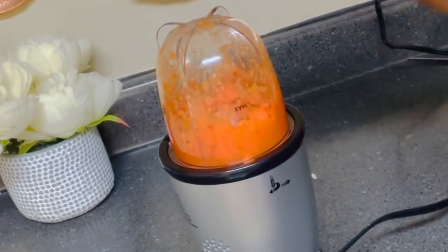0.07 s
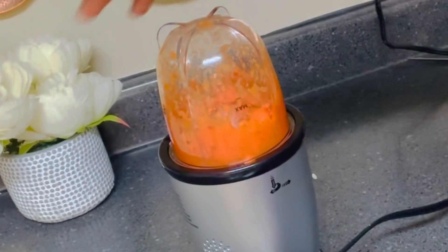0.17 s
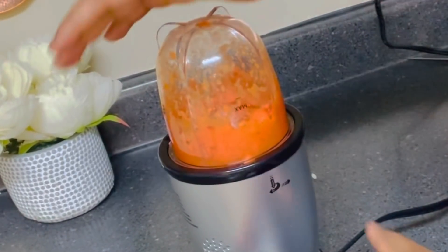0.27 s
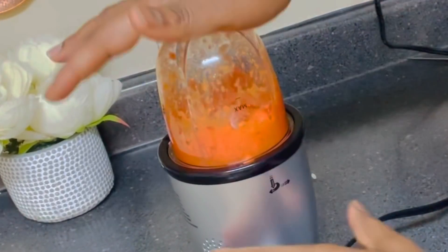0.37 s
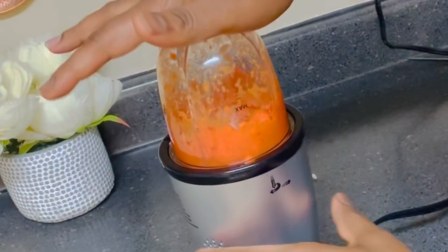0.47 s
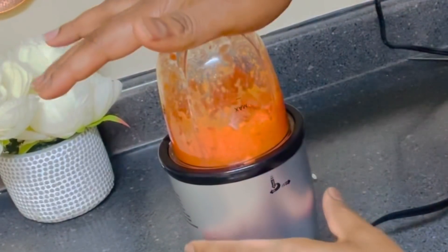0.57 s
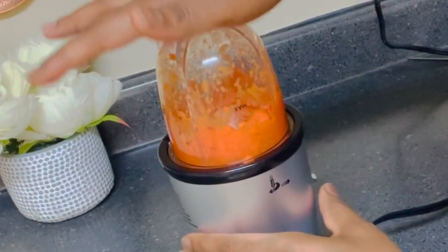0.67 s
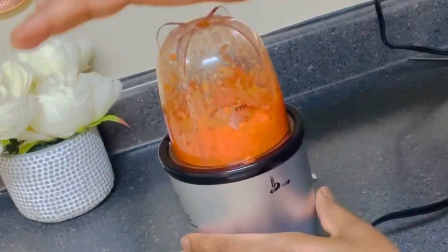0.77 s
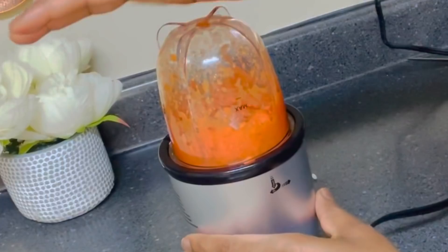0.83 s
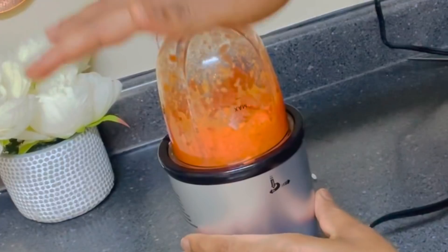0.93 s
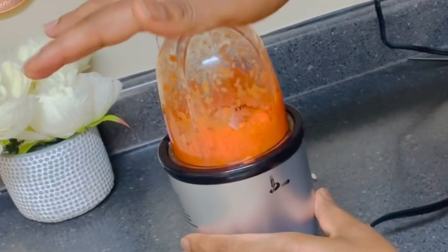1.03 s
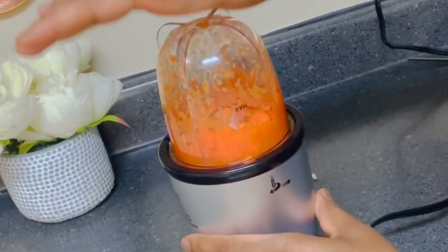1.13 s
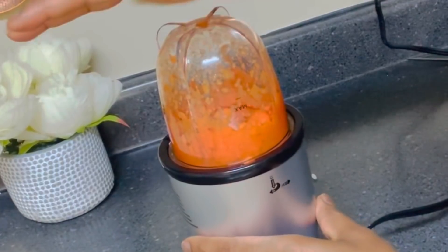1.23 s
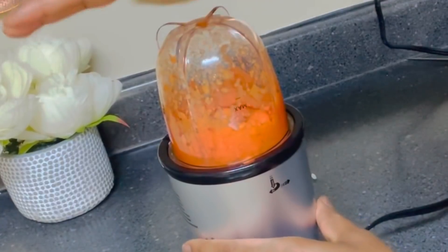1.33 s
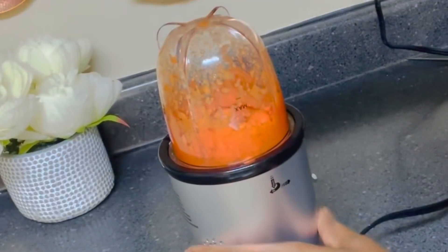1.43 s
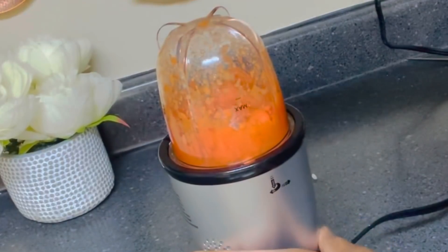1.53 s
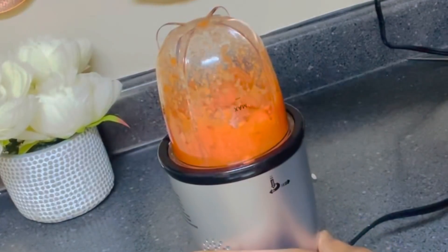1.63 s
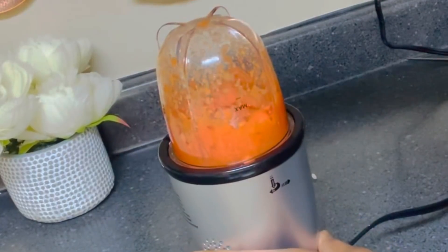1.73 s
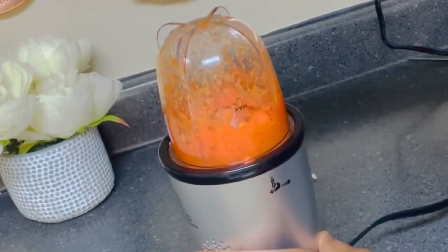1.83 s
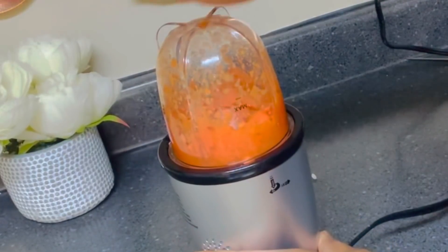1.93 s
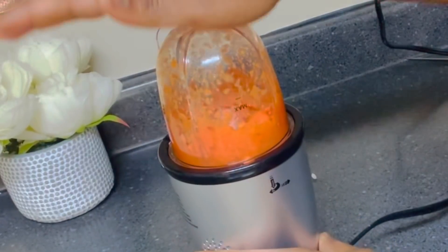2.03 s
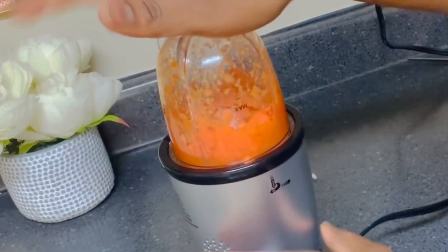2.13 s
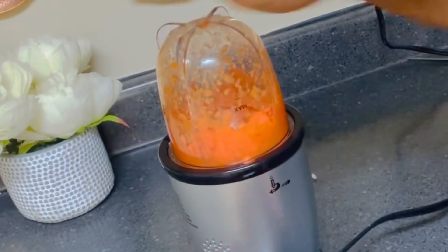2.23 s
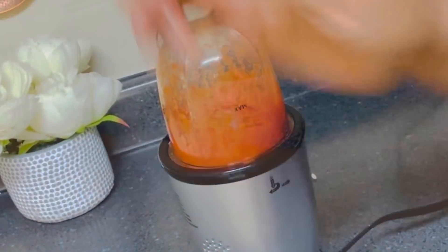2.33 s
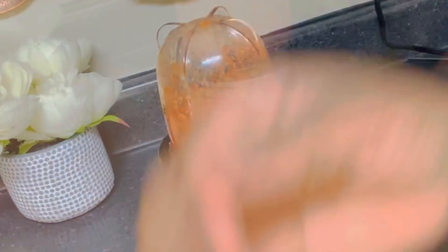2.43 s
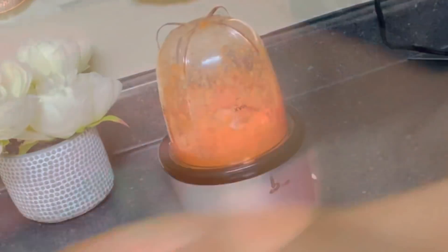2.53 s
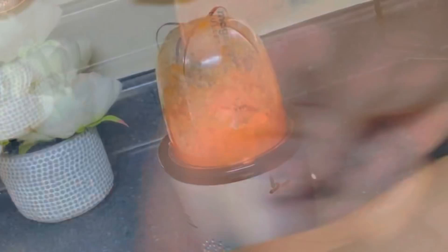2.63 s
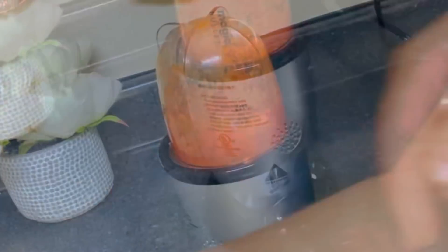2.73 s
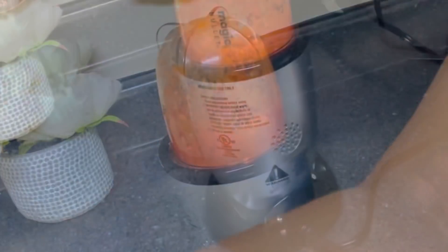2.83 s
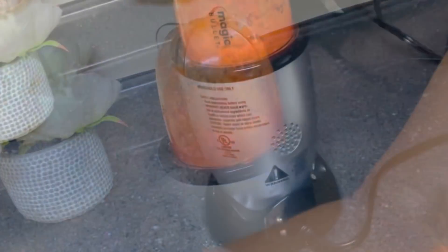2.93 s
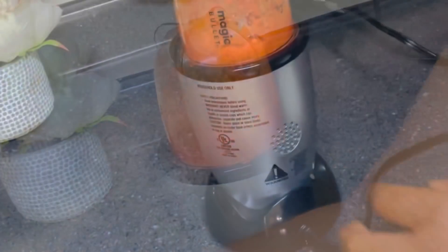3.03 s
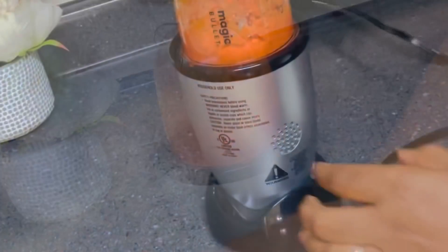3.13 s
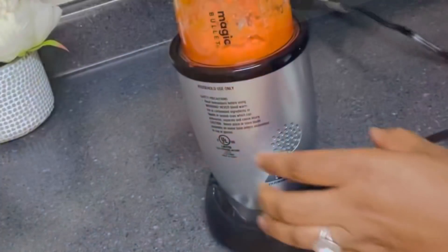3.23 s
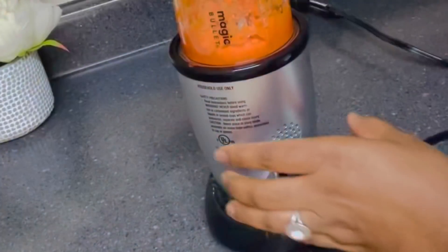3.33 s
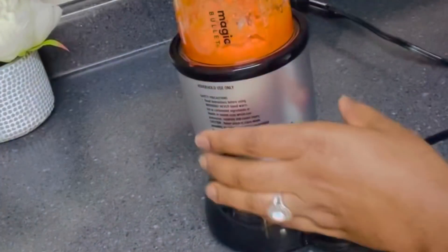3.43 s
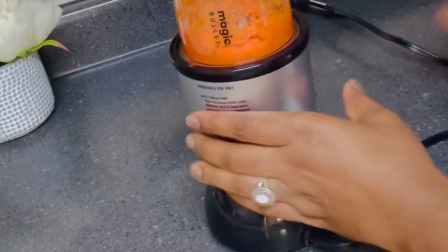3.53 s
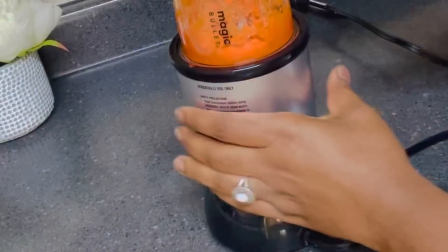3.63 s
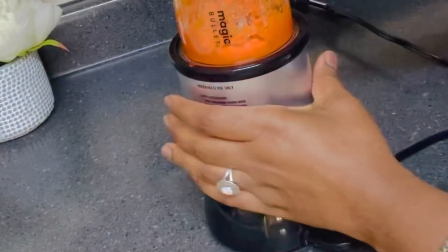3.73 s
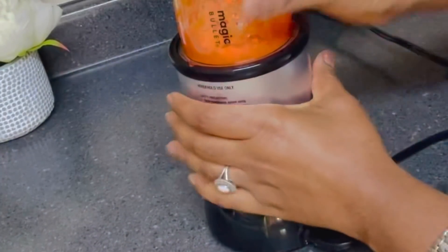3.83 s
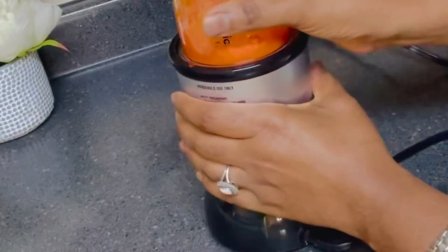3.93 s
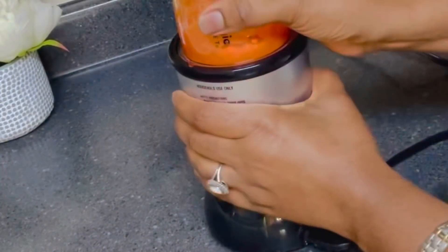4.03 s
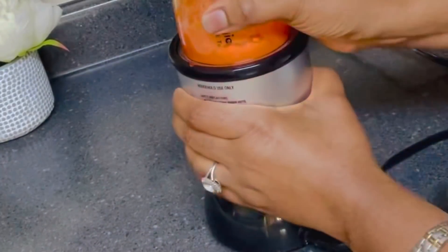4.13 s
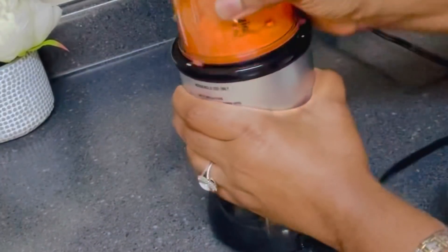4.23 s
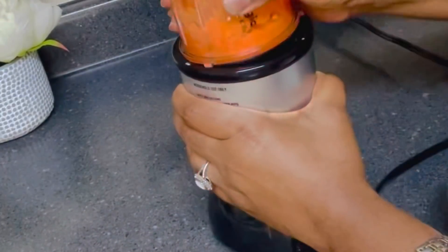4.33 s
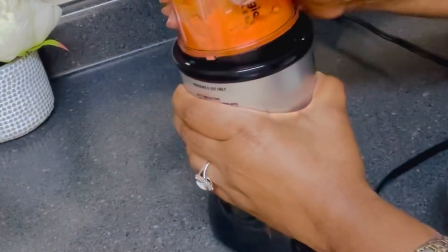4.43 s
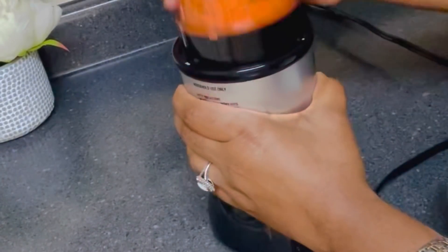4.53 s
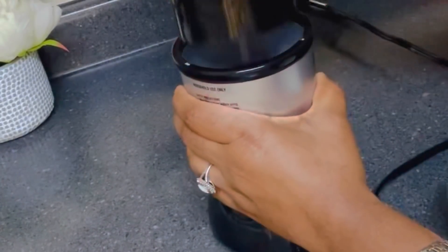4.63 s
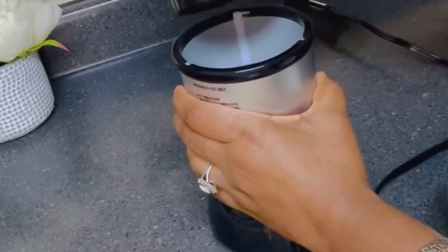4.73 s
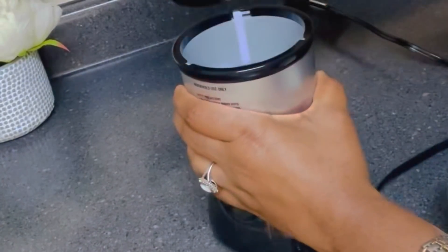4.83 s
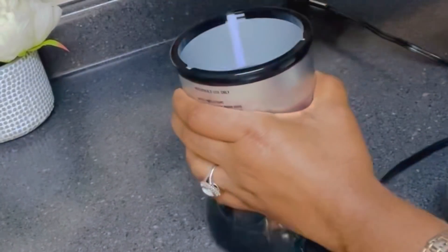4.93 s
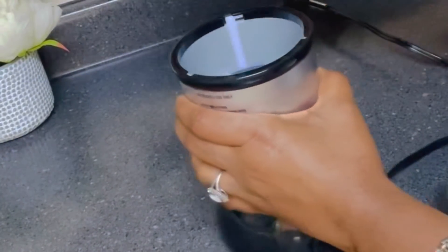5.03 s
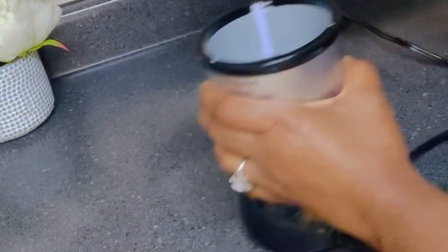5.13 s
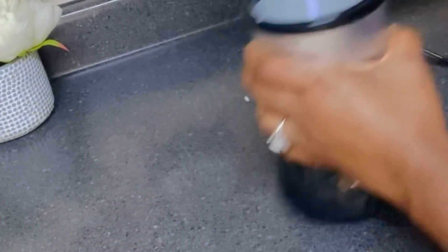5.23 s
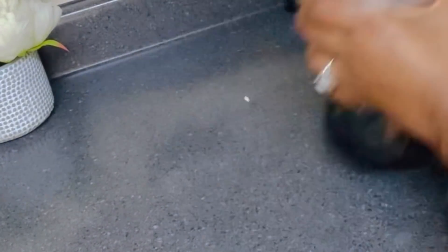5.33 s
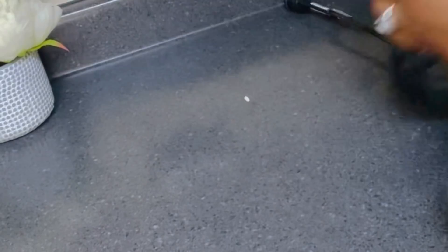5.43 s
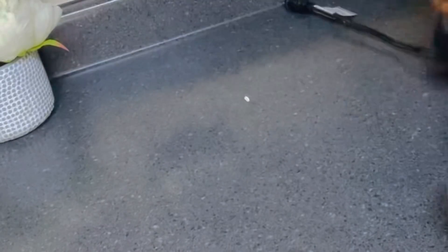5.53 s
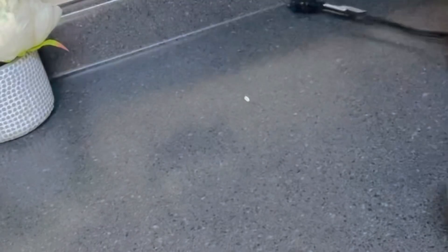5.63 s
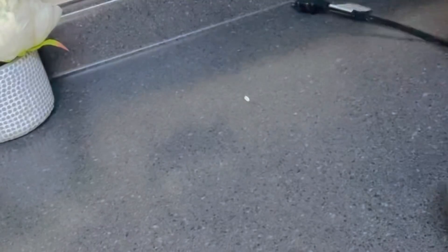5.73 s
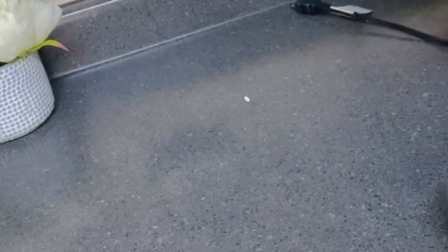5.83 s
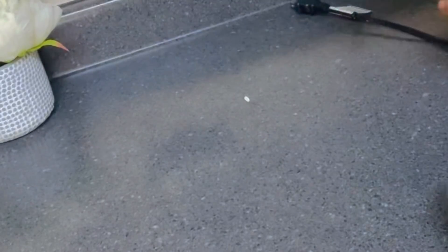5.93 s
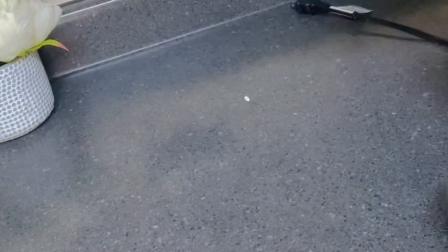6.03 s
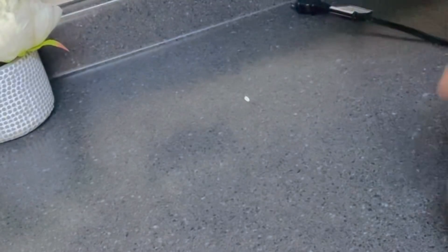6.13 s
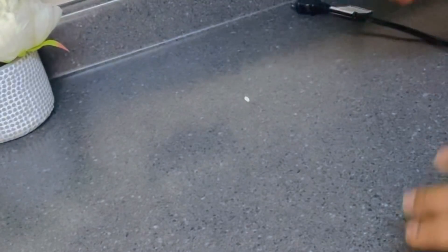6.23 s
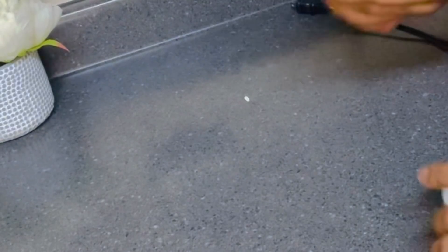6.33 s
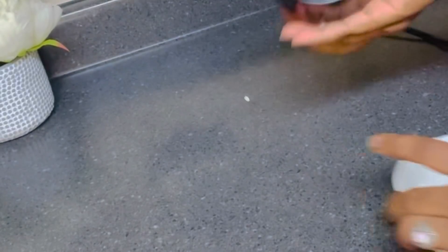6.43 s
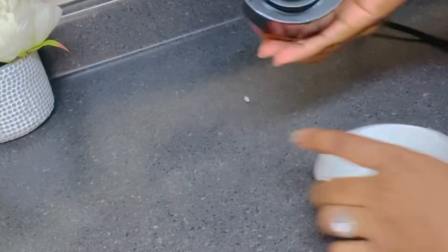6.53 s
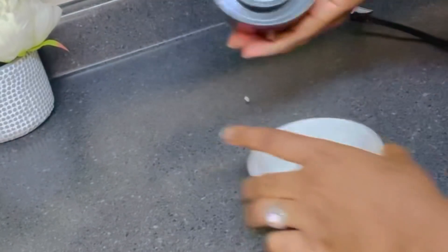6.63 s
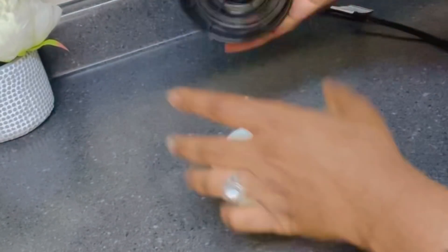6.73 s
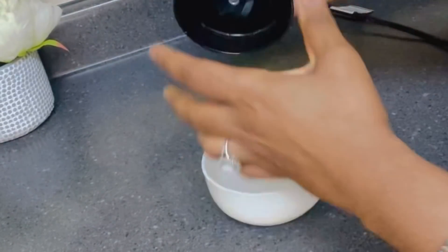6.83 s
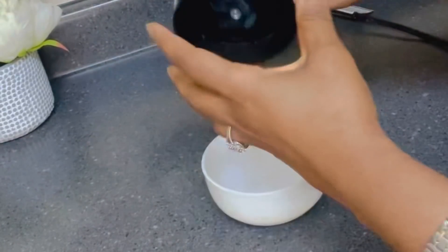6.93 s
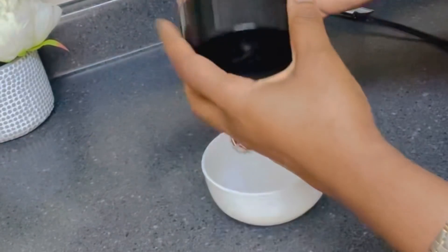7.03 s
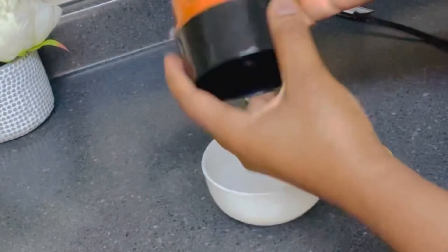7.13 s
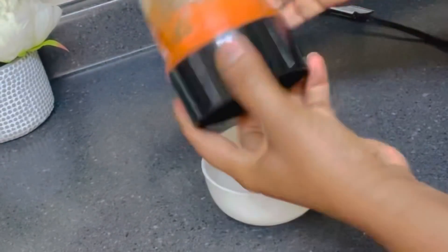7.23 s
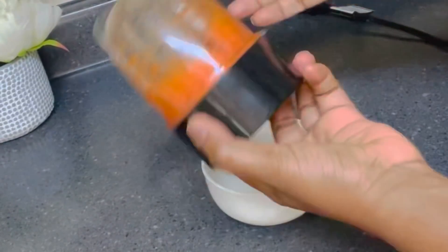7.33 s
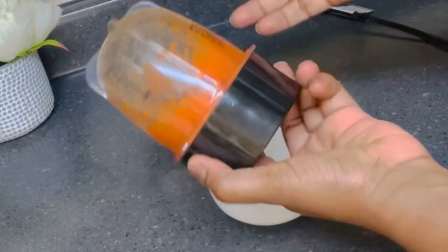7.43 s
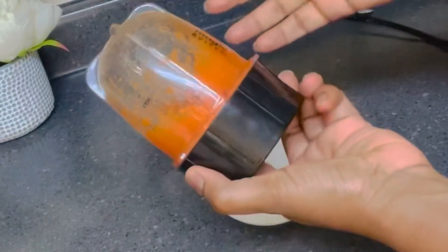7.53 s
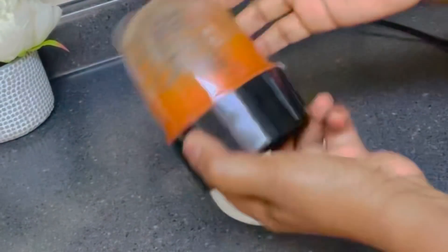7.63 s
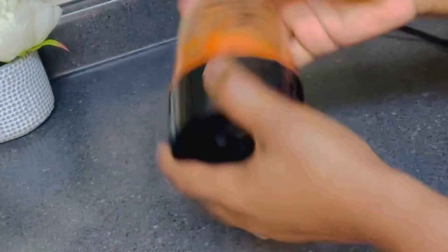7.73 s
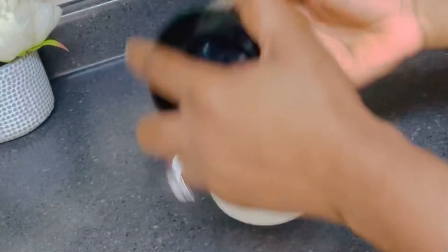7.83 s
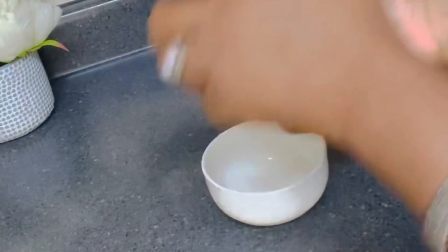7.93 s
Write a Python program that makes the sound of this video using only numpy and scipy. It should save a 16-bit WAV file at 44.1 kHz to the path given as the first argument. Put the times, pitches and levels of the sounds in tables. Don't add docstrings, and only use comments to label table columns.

```python
import sys
import numpy as np
from scipy import signal
from scipy.fft import rfft, irfft, next_fast_len
from scipy.io import wavfile
from scipy.ndimage import uniform_filter1d, map_coordinates

SR = 44100
rng = np.random.default_rng(int(sys.argv[2]) if len(sys.argv) > 2 else 0)


def field_ratio(decibels):
    return 10 ** (np.asarray(decibels, dtype=float) / 20)


def transcribe(u):
    v = np.clip(np.atleast_2d(u).T, -1, 1)
    q = np.round(v * 32767).astype(np.int16)
    wavfile.write(sys.argv[1], SR, q)


N = 352359

# (f/Hz, density/dB per Hz)
AIR = [(30, -14), (50, -3), (88, -20), (150, -10), (280, -13), (400, -16), (620, -17), (1000, -25),
       (1500, -34), (2300, -47), (3200, -41), (4200, -53), (9000, -58), (13500, -72)]
AIR_DB = -56
# (f/Hz, width/Hz, level/dB)
FRIDGE = [(62.8, 0.63, -59), (111.4, 1.5, -65), (199.4, 3.1, -69), (352, 1.6, -70.5)]
# (f/Hz, t60/s)
ROOM_T60 = [(60, 0.97), (300, 0.24), (2000, 0.54), (6000, 0.24), (14000, 0.37)]
# (f/Hz, likeness)
DIFFUSE = [(60, 0.68), (130, 1), (290, -0.38), (640, -0.19), (1410, -0.81), (3100, 0.07), (6820, 0.67),
           (15000, 0.09)]

# (f/Hz, phase/rad)
PORT_LEAD = [(0, 0), (280, -.2), (360, 1), (430, -.4), (520, -.3), (640, -1.4), (900, 0), (1300, -.6),
             (2500, -1.3), (4200, -2.5), (7000, -4.2), (9000, -3.14), (11500, 0), (14000, 3.14)]
# (f/Hz, level/dB)
PORT_LEAN = [(60, -2.5), (110, -1), (200, 2), (380, 1.5), (700, -5), (1290, -0.5), (2380, -0.5), (4400, -2),
             (8120, 1.5), (15000, -4)]

# (t/s, level/dB)
WHIR = [
    (0.0, -26.5),
    (0.84, -26),
    (2.34, -26.5),
    (2.89, -34),
    (3.13, -42),
    (3.3, -54.5),
]
# (t/s, f/Hz)
SHAFT = [(0, 117.6), (.3, 118.3), (1.6, 117.8), (3.1, 118.2)]
# (multiple of the shaft, level re whir/dB)
ORDERS = [(1.03, -20), (2.992, -16), (4.325, -23.5), (6, -10), (6.99, -16.5), (8.02, -13.5), (12.14, -17),
          (13.0, -19), (15.83, -23), (18.12, -20), (19.93, -20), (17.46, -18), (21.78, -13), (23.26, -15),
          (25.45, -20)]
# (f/Hz, density/dB per Hz)
CHURN = [(36, -61), (55, -12.5), (100, -23), (250, -17.5), (450, -8.5), (900, -13), (1500, -10),
         (2300, -13.5), (3600, -12.5), (4500, -15), (7500, -17), (10500, -23.5), (12500, -30.5),
         (15500, -26.5)]
# (f/Hz, width/Hz, gain/dB)
CUP = [(130, 49, -4.5), (206.9, 9, 18), (456, 12, -8), (523.6, 55, 14), (847, 92, 7.5), (1380, 150, 1.5),
       (1880, 74, 4), (2100, 62, 6.5), (3320, 20, 5.5), (2390, 25, 5), (2510, 30, 3.5), (2590, 60, 12),
       (2810, 68, 7.5), (3070, 21, 9), (3620, 24, 8), (2970, 430, -1), (3360, 85, 6.5), (3770, 96, 4.5),
       (4170, 28, 4), (7500, 87, 2)]
# (f/Hz, width/Hz)
DIPS = [(750, 60), (990, 60), (1960, 90), (2210, 90), (2670, 40), (3140, 90), (3480, 70), (4020, 90)]
DIP_SHARE = .45
# (f/Hz, likeness)
WHIR_LIKENESS = [(60, .99), (160, .88), (350, .35), (430, .88), (540, .84), (750, .5), (1400, .75),
                 (2000, .5), (2600, .7), (3700, .4), (6000, .33), (8000, .65)]
TILT_DB, TILT_PER_DB, FULL_DB = 3, 0.25, -24.5
FRESH_DB, SETTLE_S = 1, .4
FILL_SHARE, FILL_S = .45, 0.32

# (t/s, length/s, f/Hz, level/dB)
MOANS = [(0.298, 0.35, 2568, -33), (.95, .3, 2568, -42), (3.197, .08, 290, -47), (3.2, 0.065, 170, -46),
         (2.28, 0.72, 2612, -46), (2.38, .14, 2100, -36), (3.143, 0.18, 945, -44), (3.304, 0.046, 614, -50),
         (3.34, 0.085, 680, -57), (3.363, 0.13, 203, -52.5), (3.52, 0.077, 676, -69),
         (4.823, .08, 280, -61), (6.04, .15, 295, -58), (6.93, 0.75, 1670, -85.5), (6.6, 0.23, 1958, -62.5),
         (6.85, .07, 1958, -77), (7.31, .1, 1500, -76), (6.366, 0.065, 2600, -56), (6.43, 0.053, 3980, -64),
         (6.473, 0.06, 4930, -62), (6.62, .08, 2350, -63), (1.225, .17, 355, -33), (.58, 0.25, 352, -41),
         (1.5, .25, 352, -38.5), (7.17, .12, 285, -57), (7.25, 0.19, 121, -58), (7.35, 0.37, 300, -66.5)]

PULP_HITS = [
    (1.49, -14.5, -30.5),
    (2.9733, -19.5, -34.5),
    (3.0126, -24.5, -40),
]
LATCH_HITS = [
    (3.1459, -16.5, -24.5),
    (3.1651, -23, -39),
    (3.1996, -24, -38),
]
SCUFF_HITS = [
    (3.175, -28.5, -35),
    (3.21, -28.5, -49),
    (3.232, -25, -35.5),
    (3.27, -34, -36),
]
TAB_HITS = [
    (3.9301, -52, -69),
    (4.0228, -55, -79),
    (4.0642, -49.5, -66),
    (4.0891, -45.5, -57),
    (4.4387, -56, -73),
    (5.3757, -36.5, -50.5),
]
CUP_HITS = [
    (4.151, -40, -33),
    (4.155, -33.5, -33),
    (4.1606, -18.5, -23),
    (4.1795, -36, -23.5),
    (4.196, -31.5, -40.5),
    (4.2148, -49, -34.5),
]
FINGER_HITS = [
    (4.4654, -57.5, -52),
    (4.4988, -62, -73),
    (4.5483, -59.5, -56),
    (5.3412, -55, -50),
    (5.8294, -63.5, -53),
    (6.9749, -64, -68),
    (7.4355, -70.5, -58),
    (7.6416, -47.5, -54.5),
]
BASE_HITS = [
    (5.459, -36.5, -38.5),
    (5.464, -20.5, -25),
    (5.4894, -58.5, -36),
    (5.5094, -57, -38.5),
    (5.6976, -57.5, -40),
    (5.7205, -52, -55),
]
FEET_HITS = [
    (5.6461, -43, -48),
    (5.6737, -36, -42),
    (5.685, -38, -44),
]
LID_HITS = [
    (7.889, -52, -51.5),
    (7.897, -33.5, -40),
    (7.9269, -45.5, -47),
]
# (f/Hz, level/dB)
CRACK = [(600, -25), (1500, -4), (4000, 8.5), (7000, 5.5), (12000, -8), (16000, -9.5)]
# (ratio to body pitch, relative width, level/dB)
PLASTIC = [(.42, .3, -1), (.68, .25, -2), (1, .22, 0), (1.45, .22, -5), (2.3, .3, -15)]

# (t/s,
# f/Hz, width/Hz, level/dB, length/s)
SWELLS = [(2.43, 1950, 600, -35, .06), (3.785, 5500, 700, -72, .035), (3.78, 3000, 900, -75, .05),
          (3.934, 2900, 1100, -58, .004), (5.225, 2600, 900, -72, .03), (5.22, 1750, 200, -76, .03),
          (5.85, 3700, 700, -68, .012), (7.19, 5000, 2500, -75, .004), (7.93, 3200, 1500, -58, .02),
          (3.29, 5000, 5000, -56, .06), (3.38, 4000, 5000, -64, .07), (3.47, 3500, 4500, -73, .07),
          (5.3, 3000, 1800, -76, .05), (5.58, 3000, 5000, -60, .05), (4.95, 1250, 300, -74, .012),
          (4.198, 1800, 1600, -41, .008), (4.17, 1400, 400, -42, .015), (4.23, 480, 250, -36, .02),
          (4.3, 480, 350, -44, .025), (7.646, 5000, 4000, -60, .004), (7.9, 2700, 1200, -44, .004)]

# (t/s, peak/dB, f/Hz)
THUMPS = [(2.979, -32, 130), (3.149, -29.5, 135), (3.15, -45, 52.8), (3.22, -44, 60), (4.157, -31, 200),
          (4.182, -34, 59.2), (4.19, -30, 80), (4.2, -29, 128), (4.291, -38.5, 88.6), (4.946, -30.5, 141.4),
          (4.961, -43, 54.5), (5.466, -25, 224), (5.468, -34.5, 70), (5.7, -15, 135.3), (5.7, -24.5, 222.5),
          (5.705, -28, 47.6), (5.723, -22.5, 76), (5.881, -43, 57), (6.5, -42, 45), (7.63, -46, 71)]
# (f/Hz, t60/s)
SLAB_T60 = [(50, 0.64), (75, 0.18), (110, 0.43), (135, 0.089), (200, 0.43), (224, 0.055)]

CLINK_S = 3.147
# (f/Hz, level/dB, t60/s)
STEEL = [(4231, -57, .5), (4624, -48, .3), (6019, -35, .43), (7413, -54, .25), (8662, -61, .5),
         (10000, -51, .4), (10450, -48, .4), (12720, -58, .25), (14340, -64, .3), (15720, -52, .3)]
# (t/s, f/Hz, level/dB, t60/s)
PINGS = [
    (3.02, 6018, -52, .6),
    (3.225, 4626, -47, .6),
    (3.25, 6019, -52, .5),
    (3.93, 1800, -66, .15),
    (4.064, 1800, -65, .1),
    (4.09, 2400, -67, .2),
    (4.16, 1800, -46, .45),
    (7.432, 1850, -69, .08),
    (7.432, 1150, -65, .08),
]
# (t/s, f/Hz, level/dB, t60/s)
SNAPS = [(3.1472, 1150, -15, .012), (3.1995, 1050, -16, .008), (3.1995, 2600, -27, .006),
         (4.064, 5500, -54, .012), (4.1625, 11000, -36, .01), (4.0228, 7500, -66, .008),
         (4.09, 6300, -58, .01), (4.1615, 570, -18, .03), (4.163, 468, -28, .15), (4.165, 890, -31, .12),
         (4.18, 836, -33, .12), (4.178, 512, -22, .09), (4.187, 347, -27, .15), (4.18, 11000, -37, .008),
         (4.196, 7000, -32, .005), (4.1962, 9500, -31, .006), (4.1962, 12300, -33, .006),
         (4.946, 280, -46, .05), (5.464, 549, -31, .12), (5.464, 1400, -27, .018), (5.464, 4300, -31, .01),
         (5.464, 7500, -35, .008), (5.464, 10500, -38, .008), (5.47, 590, -44, .5), (5.5, 318, -38, .15),
         (5.6737, 6500, -43, .005), (5.674, 11000, -48, .004), (5.674, 3000, -46, .005),
         (5.701, 330, -33, .04), (7.642, 4800, -61, .015), (7.642, 5900, -60, .02),
         (7.643, 1900, -61, .015), (7.8972, 1389, -21, .008), (7.8975, 10500, -53, .008),
         (7.8975, 4511, -46, .025), (7.8975, 6300, -49, .008), (7.9015, 1066, -27, .016),
         (7.9, 915, -40, .1)]
BEAT_HZ, PAIR_S = 9, .09

# (t/s, length/s, rustle/dB)
STROKES = [(3.348, 0.06, -60.5), (3.68, 0.14, -78), (4.249, 0.11, -61), (5.2, .1, -84), (5.42, 0.2, -62),
           (5.68, .15, -70), (5.956, .3, -83.5), (6.458, 0.15, -54), (6.9, .15, -85.5), (7.701, 0.19, -74),
           (7.957, .04, -74.5)]
REACH_DB_PER_S, LEAVE_DB_PER_S, IDLE_DB, HANDS_FROM_S = 88.5, 103.5, -95, 3.5
# (f/Hz, level/dB)
SKIN = [(500, 2), (1500, 5.5), (2300, -2), (3300, -3.5), (4500, -8.5), (9000, -14.5), (14000, -29)]

# (t/s, level/dB)
SLIDE = [
    (6.26, -89.5),
    (6.3, -63.5),
    (6.43, -55.5),
    (6.57, -55),
    (6.746, -68.5),
    (6.84, -83.5),
]
# (t/s, level/dB)
BUMPS = [
    (6.29, -46.5),
    (6.419, -29),
    (6.457, -23.5),
    (6.479, -29),
    (6.498, -30),
    (6.534, -24),
]
# (f/Hz, width/Hz, level/dB)
BOWL = [(130, 72, -5.5), (350, 69, 0), (620, 100, 4), (1040, 140, -5), (1270, 74, -2.5), (1640, 220, -12.5),
        (2084, 210, -24.5), (2600, 90, -16), (3050, 90, -18), (4000, 73, -22.5)]
# (f/Hz, width/Hz, level/dB)
GLAZE = [(7416, 41, -59), (11800, 70, -59)]
# (f/Hz, level/dB)
GRIT = [(600, -16.5), (1200, 5), (2000, 1.5), (4000, -9), (7000, -18), (12500, -26.5), (16000, -36)]
SCRAPE_DB, JOLT_DB, JOLT_T60 = 10, -10.5, 0.12
SOFT_HZ = 1300

# (0 mid or 1 side, from f/Hz, to f/Hz, share of loud frames, share of faint frames)
HOLES = [(0, 8350, 9600, 1, 1), (0, 8000, 8350, .1, .3), (0, 7700, 8000, 0, .1), (0, 9600, 9950, .06, .5),
         (0, 12400, 13150, .03, .4), (0, 13150, 15100, 1, 1), (0, 15100, 16000, .7, .9),
         (1, 11050, 12400, 1, 1), (1, 10700, 11050, .35, .8), (1, 12400, 12750, .4, .8),
         (1, 12750, 13450, .2, .6), (1, 15750, 17000, 1, 1)]
# (from t/s, to t/s, from f/Hz, to f/Hz, share kept)
GATES = [(3.17, 3.42, 8200, 9900, 0), (3.17, 3.42, 10900, 12000, .3), (3.17, 3.25, 12000, 13200, .5),
         (3.17, 3.5, 13200, 15900, 0), (3.26, 3.5, 11500, 13200, .1), (3.28, 3.45, 9900, 10900, .2),
         (4.15, 4.22, 13150, 14100, 1), (4.15, 4.22, 15100, 15900, 1), (4.18, 4.26, 8350, 9600, 1),
         (4.23, 4.3, 15100, 15900, 0), (5.37, 5.41, 8350, 9600, 1), (5.46, 5.53, 8350, 9200, 1),
         (5.36, 5.39, 13150, 15900, 1), (5.4, 5.44, 13150, 15900, 0), (5.45, 5.49, 15100, 15900, 1),
         (5.66, 5.68, 8350, 14000, 1), (5.5, 5.8, 15100, 15900, 0), (7.5, 7.65, 8350, 9600, 1),
         (7.78, 7.88, 8350, 9200, 1), (7.9, 7.94, 11500, 13200, 0)]
FAINT_DB, SILENT_DB = -53, -88
SPARED_DB = 14.5


def unit(x):
    return x / np.sqrt(np.mean(x ** 2) + 1e-20)


def along(points, hz):
    f, v = np.transpose(points)
    return np.interp(np.log(hz + 1), np.log(f + 1), v)


def curves(rows, outside=None):
    s, *cols = np.transpose(rows)
    return [np.interp(np.arange(N) / SR, s, c, outside, outside) for c in cols]


def since(s):
    return np.maximum(np.arange(N) / SR - s, 0)


def wobble(rate):
    knots = rng.standard_normal(int(N * rate / SR) + 4)
    return map_coordinates(knots, [np.arange(N) * rate / SR])


def filtered(x, response):
    n = x.shape[-1]
    m = next_fast_len(n + SR // 4)
    return irfft(rfft(x, m) * response(np.fft.rfftfreq(m, 1 / SR)), m)[..., :n]


def modes(table):
    def response(f):
        total = 0
        for k, (c, w, db) in enumerate(table):
            total = total + (-1) ** k * field_ratio(db) * 1j * f * w / (c * c - f * f + 1j * f * w)
        return total
    return response


def rush(gain, alike, patchy_db):
    z = signal.stft(rng.standard_normal((2, N)), nperseg=512)[2]
    field = uniform_filter1d(rng.standard_normal(z.shape[1:]), size=5, axis=0)
    field = uniform_filter1d(field, size=8, axis=1)
    pair = signal.istft(z * field_ratio(patchy_db * unit(field)), nperseg=512)[1][:, :N]

    def mid_side_gain(hz):
        angle = np.arccos(np.clip(along(alike, hz), -1, 1)) / 2
        return gain(hz) * np.array([np.cos(angle), np.sin(angle)])

    mid, side = filtered(pair, mid_side_gain)
    return unit(np.array([mid + side, mid - side]))


def ports(x):
    def half_step(hz):
        return .5j * along(PORT_LEAD, hz) + np.log(field_ratio(along(PORT_LEAN, hz) / 2))
    return filtered(x, lambda hz: np.exp(half_step(hz) * np.array([[1], [-1]])))


def kitchen(x):
    hz, t, z = signal.stft(rng.standard_normal((2, SR * 2 // 3)), SR, nperseg=256)
    tail = signal.istft(z * field_ratio(-60 * t / along(ROOM_T60, hz)[:, None]), SR, nperseg=256)[1]
    stereo = np.array([tail[0], 0.2 * tail[0] + 0.88 * tail[1]])
    late = np.pad(x, (300, 0))[None]
    return signal.fftconvolve(late, stereo / np.linalg.norm(tail[0]), axes=1)


def even(x):
    power = uniform_filter1d(abs(rfft(x)) ** 2, size=40)
    return np.roll(irfft(np.sqrt(abs(power))), 256)[:512]


def add(out, s, x):
    part = out[:, round(s * SR):][:, :x.shape[1]]
    part += x[:, :part.shape[1]]


def room_tone():
    air = field_ratio(AIR_DB) * rush(lambda hz: field_ratio(along(AIR, hz)), DIFFUSE, patchy_db=2.6)
    white = rng.standard_normal(N)
    return air + sum(field_ratio(db) * unit(filtered(white, modes([(hz, w, 0)]))) for hz, w, db in FRIDGE)


def blender():
    whir_db, = curves(WHIR, -120)
    tilt_db = TILT_DB + TILT_PER_DB * (whir_db - FULL_DB) + FRESH_DB * np.exp(-since(0) / SETTLE_S)
    shaft_hz = curves(SHAFT)[0] * (1 + 0.0014 * wobble(9))
    turn = 2 * np.pi * np.cumsum(shaft_hz) / SR

    def colour(hz):
        dips = np.prod([1 - DIP_SHARE * abs(modes([(c, w, 0)])(hz)) ** 2 for c, w in DIPS], axis=0)
        cup = np.sqrt(1 + sum(abs(modes([m])(hz)) ** 2 for m in CUP))
        return field_ratio(along(CHURN, hz)) * cup * dips

    churn = rush(colour, WHIR_LIKENESS, patchy_db=1.29)
    spray = filtered(churn, lambda hz: hz ** 2 / (hz ** 2 + 4000 ** 2))
    churn = churn + (field_ratio(np.clip(tilt_db, -12, 12)) - 1) * spray
    main_note = filtered(churn, modes([(530, 110, 0.0021)]))
    churn = churn - FILL_SHARE * np.exp(-(since(0) / FILL_S) ** 2) * main_note
    lumps = field_ratio(0.3 * wobble(5.9) + 0.9 * wobble(45) + 0.58 * wobble(250))
    sing = sum(field_ratio(db + 1.8 * wobble(13)) * np.sin(k * turn + .9 * wobble(8)) for k, db in ORDERS)
    return field_ratio(whir_db) * ports(field_ratio(1.95) * lumps * churn + sing)


def moans():
    t, out = np.arange(N) / SR, np.zeros(N)
    for s, length, hz, db in MOANS:
        swell = field_ratio(db + 1.5 * wobble(25)) * np.exp(-((t - s) / length * 2 - 1) ** 4)
        out += swell * np.sin(2 * np.pi * hz * t + wobble(12))
    return out


def knock(out, hits, treble_db, body_hz, t60):
    t = np.arange(SR // 4) / SR
    lives = np.clip([[0.75 * t60], [t60]], .004, .3)
    envelope = (1 - np.exp(-t / np.array([[.0004], [.0013]]))) * field_ratio(-60 * t / lives)
    shell = modes([(k * body_hz, k * body_hz * w, db) for k, w, db in PLASTIC])

    def edge(f):
        return field_ratio(along(CRACK, f) + (treble_db + 13.0) * np.clip(np.log2((f + 1) / 3500), -1, 1.3))

    for s, crack_db, body_db in hits:
        rattle = envelope * rng.standard_normal((2, len(t)))
        layers = [filtered(rattle[0], edge), filtered(rattle[1], shell)]
        crack, body = [x / np.sqrt(uniform_filter1d(x * x, size=128).max()) for x in layers]
        hard = field_ratio(crack_db - 6.0) * crack + field_ratio(body_db - 1.0) * body
        add(out, s - .001, hard * field_ratio([[-1.4], [1.4]]))
        add(out, s, field_ratio(-4.5) * kitchen(even(hard)))


def knocks():
    out = np.zeros((2, N))
    knock(out, PULP_HITS, treble_db=-22, body_hz=510, t60=0.087)
    knock(out, LATCH_HITS, treble_db=-23, body_hz=900, t60=0.055)
    knock(out, SCUFF_HITS, treble_db=-25.5, body_hz=1100, t60=0.095)
    knock(out, TAB_HITS, treble_db=-14, body_hz=1300, t60=0.053)
    knock(out, CUP_HITS, treble_db=-11.5, body_hz=490, t60=0.071)
    knock(out, FINGER_HITS, treble_db=-18.5, body_hz=500, t60=0.036)
    knock(out, BASE_HITS, treble_db=-13.5, body_hz=520, t60=0.084)
    knock(out, FEET_HITS, treble_db=-20, body_hz=1000, t60=0.071)
    knock(out, LID_HITS, treble_db=-27, body_hz=1300, t60=.05)
    return ports(out)


def swells():
    out, t = np.zeros((2, N)), np.arange(SR // 4) / SR - .125
    for s, hz, w, db, length in SWELLS:
        resonance = modes([(hz, w, 0)])
        noise = filtered(rng.standard_normal((2, len(t))), lambda f: resonance(f) ** 2)
        add(out, s - .125, field_ratio(db) * np.exp(-(t / length) ** 2) * unit(noise))
    return out


def counter():
    out, t = np.zeros((2, N)), np.arange(SR // 2) / SR
    for s, db, hz in THUMPS:
        envelope = field_ratio(db - 60 * t / along(SLAB_T60, hz)) * (1 - np.exp(-t * hz * 3))
        swing = envelope * np.sin(2 * np.pi * hz * t)
        add(out, s, np.array([swing, swing]))
        add(out, s, field_ratio(-13.5) * kitchen(swing))
    return out


def clink():
    out, t = np.zeros((2, N)), np.arange(SR) / SR
    for s, hz, db, t60 in [(CLINK_S, *mode) for mode in STEEL] + PINGS + SNAPS:
        first = np.sin(2 * np.pi * hz * t + [[0], [1.1]])
        second = 0.78 * np.exp(-t / PAIR_S) * np.sin(2 * np.pi * (hz + BEAT_HZ) * t + [[2.2], [.4]])
        add(out, s, field_ratio(db - 60 * t / t60) * (1 - np.exp(-t / .0003)) * (first + second))
    return out


def hands():
    rustle = field_ratio(2.5 * wobble(27)) * rush(lambda hz: field_ratio(along(SKIN, hz)), DIFFUSE, patchy_db=2.5)
    t = np.arange(N) / SR
    level = field_ratio(IDLE_DB)
    for s, length, db in STROKES:
        reach_db = REACH_DB_PER_S * np.maximum(s - t, 0)
        level = level + field_ratio(db - reach_db - LEAVE_DB_PER_S * since(s + length))
    return (t > HANDS_FROM_S) * level * unit(rustle)


def bowl():
    hiss_db, = curves(SLIDE, -120)
    scrape = field_ratio(hiss_db + SCRAPE_DB)
    blows = np.zeros(N)
    for s, db in BUMPS:
        scrape = scrape + (since(s) > 0) * field_ratio(db + JOLT_DB - 60 * since(s) / JOLT_T60)
        blows[round(s * SR)] = field_ratio(db + 20.5)
    chatter = field_ratio(0.59 * wobble(83))
    near = [(100, 1.0), (400, 0.52), (800, 0.086)]  # (f/Hz, left-right likeness)
    rumble = rush(lambda hz: abs(modes(BOWL)(hz)), near, patchy_db=0.5)
    body = field_ratio(6.5) * scrape * unit(chatter * rumble)
    grit = field_ratio(hiss_db + 9.5) * rush(lambda hz: field_ratio(along(GRIT, hz)), near, patchy_db=3.5)
    drive = field_ratio(1.0 * (hiss_db + 57.0)) * rng.standard_normal((2, N))
    ring = 0
    for hz, w, db in GLAZE:
        ring = ring + field_ratio(db) * filtered(drive, modes([(hz, w, 0)])) * np.sqrt(SR / w / np.pi)
    struck = filtered(blows, lambda hz: modes(BOWL)(hz) / (1 + 1j * hz / SOFT_HZ) ** 2)
    return grit + ring + (body + struck) * field_ratio([[-2.1], [2.1]])


def scene():
    machine = room_tone() + blender() + moans()
    contacts = knocks() + swells() + counter() + clink()
    return machine + contacts + hands() + bowl()


def top_cut(x):
    return signal.sosfilt(signal.butter(12, 15860, fs=SR, output="sos"), x)


def record(dry):
    dry = filtered(dry, lambda hz: hz ** 8 / (hz ** 8 + 37 ** 8) * (hz < 15860))
    hz, t, z = signal.stft([dry[0] + dry[1], dry[0] - dry[1]], SR, nperseg=2048)
    treble = np.sqrt(np.sum(abs(z[:, (hz > 4000) & (hz < 8000)]) ** 2, axis=(0, 1)) / 3)
    whole = z[0].copy()
    for side, lo, hi, loud_share, faint_share in HOLES:
        share = np.where(treble < field_ratio(FAINT_DB), faint_share, loud_share)
        gone = rng.random(len(t) // 2 + 1).repeat(2)[:len(t)] < share
        z[side][np.ix_((hz >= lo) & (hz < hi), gone & (treble > field_ratio(SILENT_DB)))] = 0
    for start, end, lo, hi, share in GATES:
        cell = np.ix_((hz >= lo) & (hz < hi), (t >= start) & (t <= end))
        z[0][cell] = whole[cell] * (rng.random(len(t))[cell[1]] < share)
    power = abs(whole) ** 2
    lines = power > field_ratio(SPARED_DB) * uniform_filter1d(power, size=41, axis=0)
    z[0][lines] = whole[lines]
    mid, side = signal.istft(z, SR, nperseg=2048)[1][:, :N] / 2
    return top_cut(np.array([mid + side, mid - side]))


dry = scene()
out = record(dry)
transcribe(out)
```